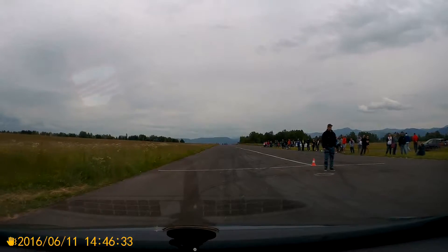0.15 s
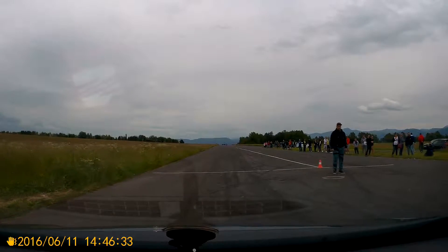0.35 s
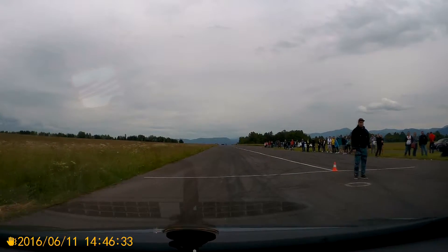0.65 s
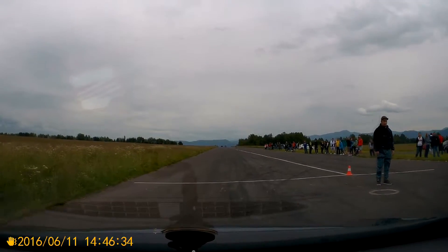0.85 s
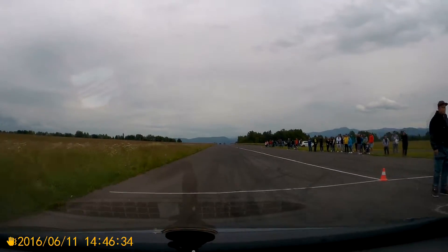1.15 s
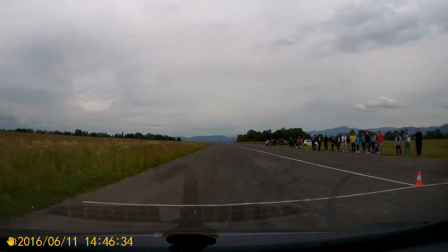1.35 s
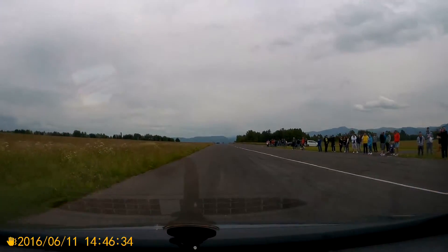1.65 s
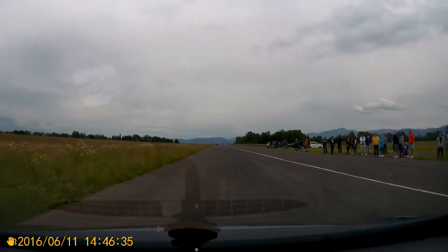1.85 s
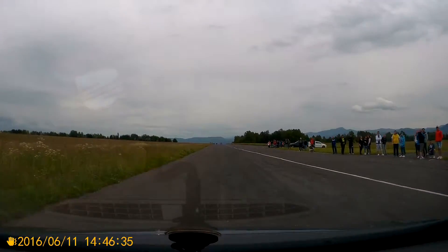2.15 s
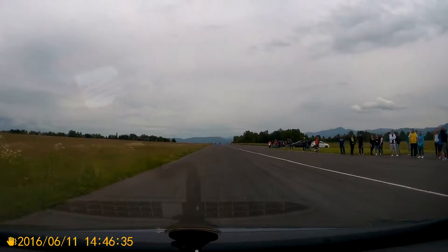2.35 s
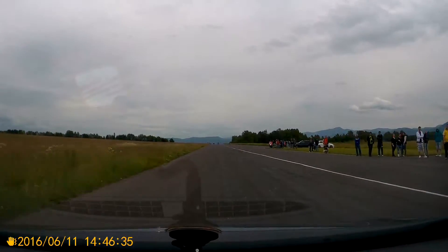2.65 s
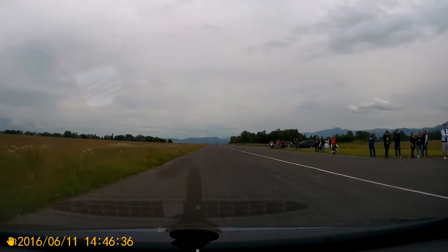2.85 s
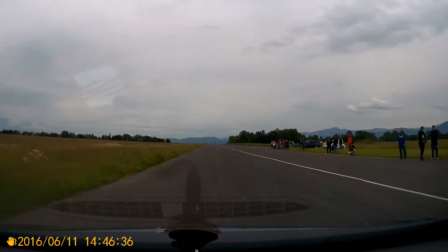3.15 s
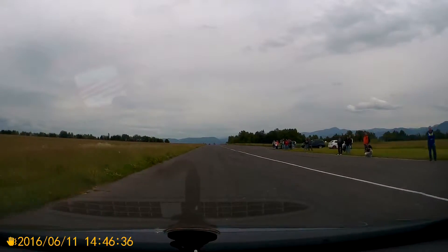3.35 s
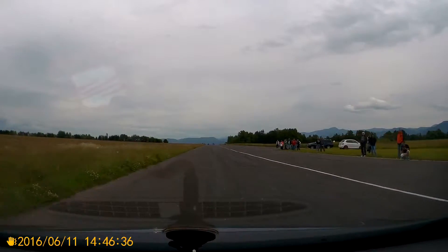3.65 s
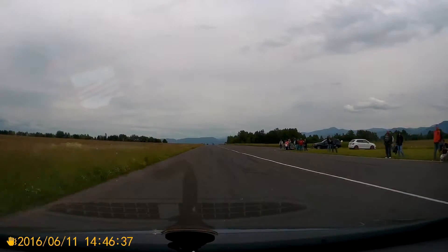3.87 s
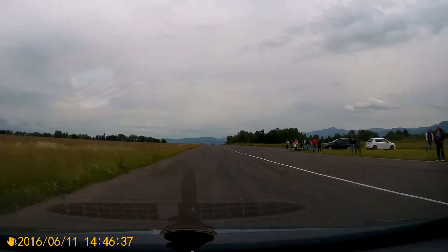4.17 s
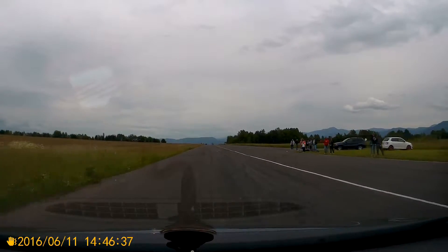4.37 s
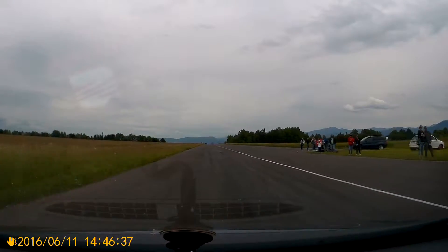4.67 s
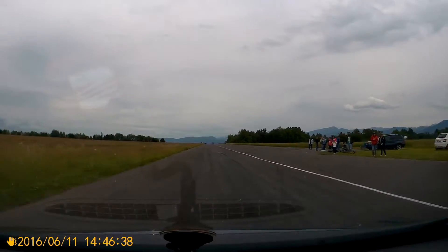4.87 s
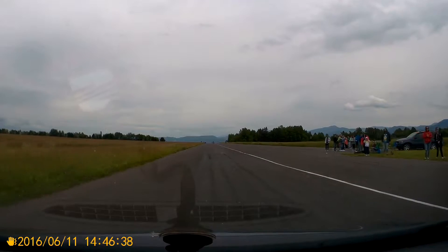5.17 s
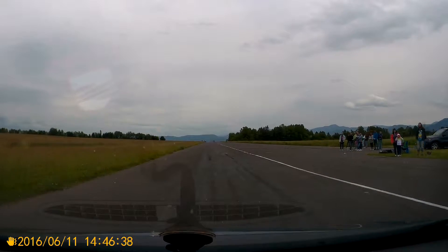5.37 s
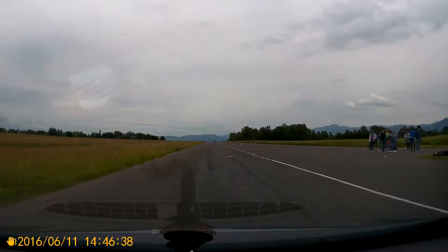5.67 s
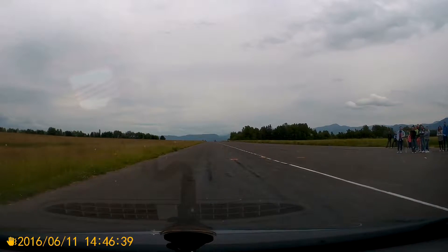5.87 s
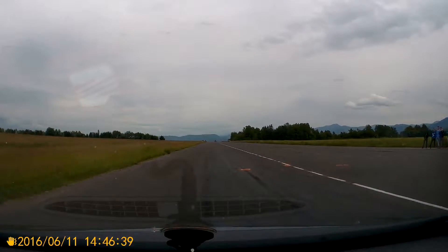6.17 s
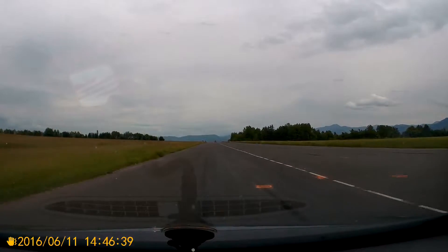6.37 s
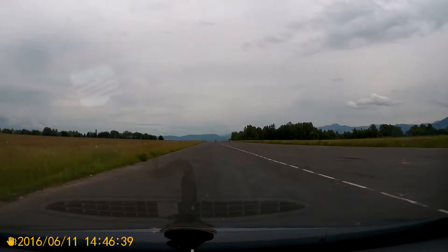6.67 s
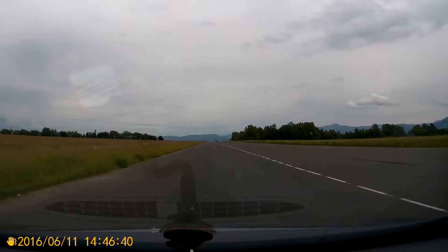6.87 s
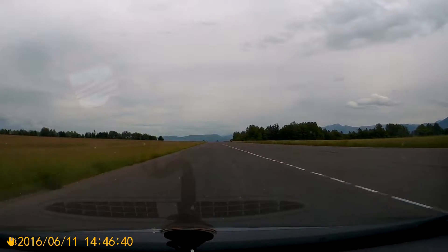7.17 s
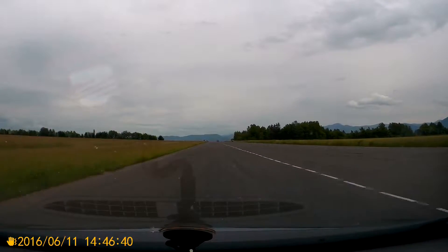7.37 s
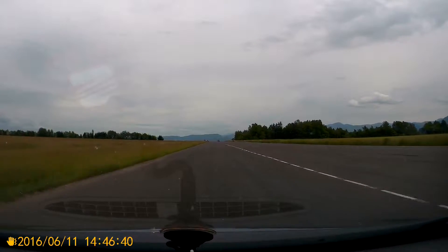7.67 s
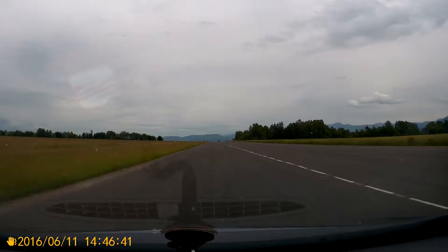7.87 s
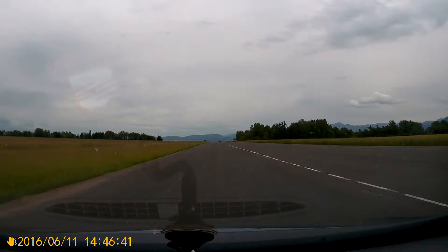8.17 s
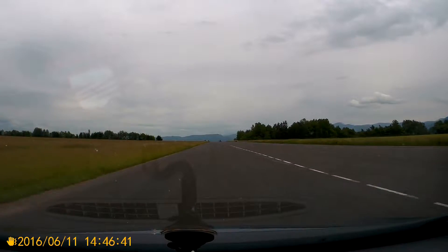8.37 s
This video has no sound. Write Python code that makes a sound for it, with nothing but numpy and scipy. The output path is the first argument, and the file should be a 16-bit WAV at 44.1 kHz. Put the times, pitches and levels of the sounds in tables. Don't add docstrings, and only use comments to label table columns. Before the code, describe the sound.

Inside a car cabin, a diesel engine revs into a violent banging launch, plastic rattling, then pulls hard through two upshifts over rumbling tyres.

```python
import sys
import numpy as np
from scipy import signal
from scipy.fft import rfft, irfft, next_fast_len
from scipy.io import wavfile
from scipy.ndimage import uniform_filter1d, map_coordinates

SR = 44100
rng = np.random.default_rng(int(sys.argv[2]) if len(sys.argv) > 2 else 0)


def inscribe(sig):
    pcm = np.round(np.clip(np.atleast_2d(sig).T, -1, 1) * 32767)
    wavfile.write(sys.argv[1], SR, pcm.astype(np.int16))


def to_linear_factor(level_db):
    exponent = np.asarray(level_db, float) / 20
    return 10 ** exponent


N = 375732

# (time [s], level [dB])
FLOOR_SHAKE = [(0, -8), (.39, -1), (.6, 16), (.7, 19), (1.15, 19.5), (1.27, 17.5), (1.4, 8), (1.58, 12.5),
               (2, 3), (2.7, -0.5), (4.3, 4), (5.52, 2.1), (5.9, 3.5), (8.52, -10)]
# (frequency [Hz], level [dB])
RUMBLE_SPECTRUM = [(12, -37.5), (25, 18.5), (45, 20), (70, 7.5), (110, 17.5), (150, 5.5), (220, -7),
                   (320, -52), (900, -120)]
# (frequency [Hz], level [dB])
HISS_SPECTRUM = [(1800, -25), (3000, -7.5), (3800, -15), (8000, -20.5), (11000, -23.5), (15700, -32)]
ROLLING_DB = -35

# (frequency [Hz], level [dB])
TICK_SPECTRUM = [(1180, -21), (2000, -0.5), (2820, -2), (3650, 5), (4560, -6.5), (5140, 1.5), (6050, -5.5),
                 (7970, -4.5), (8830, -6), (10200, -8.5), (12600, -20.5), (13800, -19), (15600, -33.5)]
# (time [s], level [dB])
CHATTER_SPELLS = [
    [(0.62, -56), (0.846, -43.5), (1.25, -49)],
    [(1.43, -45.5), (1.466, -52), (1.67, -48)],
    [(1.67, -64), (1.95, -63.5), (2.13, -64.5)],
    [(5.05, -68), (5.288, -57), (5.5, -79)],
]
# (first [s], last [s], touches [count], first level [dB], last level [dB])
ROCKING_RUNS = [(0.648, 0.6807, 5, -24, -26), (0.697, 0.72, 4, -24.5, -26.5),
                (0.742, 0.7855, 6, -21.5, -28.5), (.803, 0.8324, 4, -28, -23.5),
                (0.859, 0.894, 5, -28, -29.5), (0.905, 0.93, 5, -22.5, -29), (0.955, 1.029, 7, -31, -25),
                (1.088, 1.116, 5, -25, -28.5), (1.148, 1.18, 4, -39, -32), (1.205, 1.253, 6, -24, -33.5),
                (1.462, 1.4984, 5, -24.5, -26), (1.56, 1.592, 4, -21.5, -34.5), (1.644, 1.834, 4, -21, -30),
                (1.679, 1.9127, 5, -22.5, -27), (1.882, 2.155, 6, -29.5, -44.5), (5.123, 5.44, 7, -31, -40),
                (6.133, 6.2416, 4, -44, -42), (6.111, 6.227, 4, -57, -42), (6.767, 6.826, 4, -44, -43),
                (7.4344, 7.4984, 4, -43.5, -39.5), (7.514, 7.5438, 4, -39, -62)]
# (time [s], level [dB])
HARD_TOUCHES = [(0.569, -46), (.5909, -54.5), (0.7298, -22.5), (0.7527, -14.5), (.8434, -12), (0.9303, -16),
                (1.107, -29), (1.2685, -35), (1.3021, -33), (1.3503, -38.5), (1.38, -34), (1.393, -38.5),
                (1.449, -19), (1.4602, -26.5), (1.5319, -23.5), (1.6202, -26.5), (1.7619, -27.5),
                (1.921, -34), (1.9958, -27.5), (2.047, -30)]
# (time [s], level [dB])
LIGHT_TOUCHES = [(4.2588, -55.5), (4.6885, -52), (4.9141, -48), (5.097, -52), (5.1454, -37), (5.191, -38),
                 (5.2438, -36), (5.308, -42.5), (5.3378, -24), (5.3463, -36.5), (5.362, -33.5),
                 (5.4135, -42), (5.5428, -46.5), (5.6046, -34.5), (5.655, -42), (5.6914, -57),
                 (5.766, -39.5), (5.8674, -49), (6.4239, -47), (6.5056, -42.5), (6.5616, -36), (7.009, -48),
                 (7.07, -56), (7.577, -42.5), (7.613, -43), (7.716, -41.5), (7.919, -42), (8.023, -38),
                 (8.034, -41.5), (8.3802, -49)]
EARLY_S, UNEVEN_DB = .001, 2.2
BOUNCE_S, BOUNCE_DB = 0.0075, -10.5
GRAZE_S, GRAZE_DB = 0.0025, -15
BRIGHT, BRIGHT_PER_DB = .5, 1.86

# (time [s], peak level [dB],
# t60 [s], share in the latch [0-1])
PLASTIC_KNOCKS = [(.843, -6.5, 0.027, 0.2), (.93, -5.5, 0.027, 0.3), (1.022, -11.5, 0.021, 0.3),
                  (1.105, -26, 0.025, 0.8), (1.21, -22, .1, 0.4), (1.277, -12.5, 0.038, 0.3),
                  (1.308, -12.5, 0.038, 0), (1.455, -14, 0.07, 0.5), (1.52, -23, 0.1, 0.43),
                  (2.5, -34, 0.046, 0.94), (5.083, -29.5, 0.052, 0.7), (5.207, -21.5, 0.056, 0),
                  (5.243, -9, 0.028, 0.07), (5.447, -36, 0.02, 0.7)]
# (frequency [Hz], level [dB])
LEVER_SPECTRUM = [(290, -41.5), (500, -4.5), (923, 1), (1140, -5), (1520, -22.5), (2610, -18),
                  (3080, -34.5), (4260, -33.5), (6000, -59), (7800, -91), (13200, -120)]
# (frequency [Hz], level [dB])
LATCH_SPECTRUM = [(800, -27.5), (1330, 6), (2200, -12.5), (2600, -7), (3400, -20), (3900, -17.5),
                  (4300, -28.5), (4800, -32.5), (8000, -42)]
SPRING_S = 2.5

# (time [s], blow level [dB], shell boom level [dB], boom length [s], trim crash level [dB])
WHEEL_HOPS = [(0.641, -2, -9.5, 0.068, -23), (.725, 3.5, -2, 0.059, -14.5), (0.808, -0.5, 2, 0.055, -10.5),
              (0.896, 2, 0.5, 0.052, -12), (0.985, 1.5, 0, 0.045, -16.5), (1.073, -6.5, -5.5, 0.051, -18.5),
              (1.169, -12, -8.5, 0.014, -31.5), (1.195, -6.5, -2, 0.034, -22.5),
              (1.441, -26, -6, 0.039, -27.5), (1.508, -18, -24, 0.19, -32.5),
              (1.743, -22.5, -21, 0.16, -37), (5.339, -12.5, -18, 0.2, -49)]
# (frequency [Hz], level [dB])
CRASH_SPECTRUM = [(120, -22), (200, 1), (424, -2.5), (512, 2), (683, -5), (1130, -7.5), (1330, -18.5),
                  (1520, -13), (4000, -49.5), (5200, -65), (8800, -120)]
TAUT_HZ, SLACK_HZ = 53.45, 41.3
GRIP_S = 1.12

# (time [s], firing rate [firings per second])
FIRING_RATE = [(0, 82.8), (.13, 84.5), (.22, 100), (.42, 124), (.7, 144), (1.2, 153), (1.48, 153),
               (1.9, 77.2), (2.1, 79.6), (2.9, 101.3), (3.7, 121.9), (4.5, 138.7), (5.05, 147.9),
               (5.2, 153.5), (5.38, 154), (5.62, 99.8), (7.8, 121.8), (8.52, 128)]
# (time [s], level [dB])
ENGINE_LOAD = [(0, 6.5), (.7, 7), (1.15, -10.5), (1.4, -4), (1.55, 6), (1.72, -1.5), (2, -2.5), (2.7, -0.5),
               (4.3, 3.5), (5.1, 4), (5.3, 4), (5.52, 3.5), (5.6, -0.5), (5.9, -0.7), (8.52, 2)]
QUARTER_ORDERS_DB = [-43.5, -42, -30, -43.5, -46, -35.5, -39.5, -41, -42.5, -39.5, -37, -50, -36, -44.5,
                     -44.5, -47.5, -43, -49.5, -40.5, -59, -46.5, -45.5, -45, -50, -57.5, -43.5, -41.5]
# (frequency [Hz], level [dB])
CABIN_PATH = [(42, 2), (60, -8.5), (110, 0.5), (190, -8.5), (246, 4.5), (290, -6), (325, -1), (360, 5.5),
              (395, -2.5), (432, 7.5), (467, -7.5), (515, 1.5), (1000, -15.5)]
# (frequency [Hz], level [dB])
EXHAUST_PATH = [(80, -23.5), (92, -9.5), (103, 1), (115, 2), (124, 6.5), (138, 5), (149, 10), (165, 10),
                (184, 10), (206, 11), (230, 6), (248, 11), (278, -2.5), (305, 10)]
# (frequency [Hz], level [dB])
ROAR_SPECTRUM = [(88, -2), (150, 3), (179, -4), (220, -3.5), (278, -5.5), (431, -4.5), (562, -9),
                 (787, -14.5), (860, -13.5), (1030, -17.5), (1120, -15.5), (2070, -34.5), (5000, -64),
                 (6500, -94), (11000, -120)]
# (from [s], to [s])
CLUTCH_SPANS = [
    (0, .62),
    (1.26, 1.9),
    (5.14, 5.62),
]
# (from [s], to [s])
NEUTRAL_SPANS = [
    (1.27, 1.39),
    (5.17, 5.34),
]
# (time [s], swell [dB], half length [s])
CLUTCH_GRABS = [
    (1.26, 10, 0.17),
    (1.496, 10.5, 0.15),
    (5.264, 2.5, 0.18),
]
ROAR_DB, ROAR_DB_PER_OCTAVE, ROAR_DB_PER_S, SLIP_ROAR_DB = -32, 5.5, 0.7055, 4.5

# (from [s], to [s])
DULL_SPANS = [(.812, .83), (1.32, 1.375), (1.4, 1.43), (1.665, 1.878), (1.975, 2.012), (5.243, 5.275)]
DULL_HZ, TOP_HZ = 8800, 15700


def unit(x):
    return x / np.sqrt(np.mean(x ** 2) + 1e-20)


def along(points, hz):
    f, v = np.transpose(points)
    return np.interp(np.log(hz + 1), np.log(f + 1), v)


def curves(rows, outside=None):
    s, *cols = np.transpose(rows)
    return [np.interp(np.arange(N) / SR, s, c, outside, outside) for c in cols]


def during(spans, size):
    t = np.arange(N) / SR
    inside = sum(1. * (a < t) * (t < b) for a, b in spans)
    return uniform_filter1d(inside, size)


def wobble(rate):
    coarse = np.arange(0, N + 32, 32)
    knots = rng.standard_normal(int(N * rate / SR) + 5)
    return np.interp(np.arange(N), coarse, map_coordinates(knots, [coarse * rate / SR]))


def coloured(x, spectrum):
    m = 4096
    gain = to_linear_factor(along(spectrum, np.fft.rfftfreq(m, 1 / SR)))
    cepstrum = irfft(np.log(gain + 1e-6), m)
    cepstrum[1:m // 2] *= 2
    cepstrum[m // 2 + 1:] = 0
    ring = irfft(np.exp(rfft(cepstrum)), m)
    return signal.fftconvolve(x, ring / np.linalg.norm(ring))[:len(x)]


def noise(spectrum):
    m = next_fast_len(N)
    gain = to_linear_factor(along(spectrum, np.fft.rfftfreq(m, 1 / SR)))
    return unit(irfft(rfft(rng.standard_normal(m)) * gain, m)[:N])


def add(track, s, sound):
    part = track[round(s * SR):][:len(sound)]
    part += sound[:len(part)]


def road():
    shake_db, = curves(FLOOR_SHAKE)
    rumble = unit(to_linear_factor(3.3 * wobble(4.8)) * noise(RUMBLE_SPECTRUM))
    return to_linear_factor(ROLLING_DB + shake_db) * rumble + to_linear_factor(-70.5) * noise(HISS_SPECTRUM)


def touches():
    first, last, count, first_db, last_db = np.transpose(ROCKING_RUNS)[:, :, None]
    chance = rng.standard_normal((len(ROCKING_RUNS), 8, 2))
    done = np.arange(8) / (np.round(count) - 1)
    s = first + (last - first) * done + EARLY_S * chance[..., 1]
    db = first_db + (last_db - first_db) * done + UNEVEN_DB * chance[..., 0]
    rocking = np.transpose([s[done <= 1], db[done <= 1]])
    rows = np.vstack([rocking, HARD_TOUCHES, LIGHT_TOUCHES])
    spread = rng.standard_normal((2, 2, len(rows))) * [[.3], [5]]
    rebound = np.transpose([BOUNCE_S * np.exp(spread[0, 0]), BOUNCE_DB + spread[0, 1]])
    graze = np.transpose([-GRAZE_S * np.exp(spread[1, 0]), GRAZE_DB + spread[1, 1]])
    return np.vstack([rows, rows + rebound, rows + graze])


def mount():
    ticks, t = np.zeros(N), np.arange(SR // 40) / SR
    buzz_fade = to_linear_factor(-15 - 60 * t / 0.027) + to_linear_factor(-15 - 60 * t / 0.076)
    rows = touches()
    grains = rng.standard_normal((len(rows), len(t)))
    for (s, db), grain in zip(rows, grains):
        bright = np.clip(BRIGHT + BRIGHT_PER_DB * (db + 30.5), 0, 1)
        contact = np.array([1, -bright + 0.11 * grain[0], 0.44 * grain[1]])
        add(ticks, s, to_linear_factor(db + 12.5) * contact)
        add(ticks, s, to_linear_factor(db - 9.5) * grain * buzz_fade)
    level = sum(to_linear_factor(curves(rows, outside=-120)[0]) for rows in CHATTER_SPELLS)
    crowd = unit(rng.standard_normal(N) * to_linear_factor(1.3 * wobble(580)))
    return coloured(ticks + to_linear_factor(-3) * level * crowd, TICK_SPECTRUM)


def knocks():
    lever, latch, spring = np.zeros(N), np.zeros(N), np.zeros(N)
    t = np.arange(SR // 5) / SR
    for s, db, t60, thin in PLASTIC_KNOCKS:
        fade = to_linear_factor(-60 * (t / np.clip(t60, .01, .2)) ** 1.65) * (1 - np.exp(-t / 0.00016))
        hit = to_linear_factor(db - 1.0) * fade * rng.standard_normal(len(t))
        share = np.clip(thin, 0, 1)
        add(lever, s, (1 - share) * hit)
        add(latch, s, share * hit)
        add(spring, s, (abs(s - SPRING_S) < .01) * hit)
    ring = to_linear_factor(-60 * t / .09) * (np.sin(2 * np.pi * 3500 * t) + np.sin(2 * np.pi * 4300 * t))
    ringing = to_linear_factor(-42) * signal.fftconvolve(spring, ring)[:N]
    return coloured(lever, LEVER_SPECTRUM) + coloured(latch, LATCH_SPECTRUM) + ringing


def hops():
    body, shake = np.zeros(N), np.zeros(N)
    t = np.arange(SR // 3) / SR
    lead = .012
    u = t - lead
    for s, blow_db, boom_db, length, crash_db in WHEEL_HOPS:
        boom_hz = TAUT_HZ if s < GRIP_S else SLACK_HZ
        done = np.clip(t / (length + lead), 0, 1)
        swell = np.abs(np.sin(np.pi * done ** 1.09)) ** 0.52
        boom = swell * np.cos(2 * np.pi * boom_hz * u)
        blow = np.exp(-np.where(u < 0, (u / 0.0048) ** 2, u / 0.015)) * np.cos(2 * np.pi * 140 * u)
        panel = to_linear_factor(crash_db + 4.5 - 60 * t / 0.11) * np.sin(2 * np.pi * 512 * t)
        add(body, s - lead, to_linear_factor(blow_db) * blow + to_linear_factor(boom_db) * boom)
        add(body, s - .004, panel)
        add(shake, s - .007, to_linear_factor(crash_db) * np.clip(t / 0.0026, 0, 1) * (1 - done ** 3))
    jolts = to_linear_factor(3.2 * wobble(120))
    return body + shake * unit(jolts * noise(CRASH_SPECTRUM))


def engine():
    rate, = curves(FIRING_RATE)
    load_db, = curves(ENGINE_LOAD)
    t = np.arange(N) / SR
    free = during(CLUTCH_SPANS, size=3000)
    turn = 2 * np.pi * np.cumsum(rate) / SR

    howl_db = 23 * during(NEUTRAL_SPANS, size=2500) - 8
    unloaded_db = {.5: 5, 1: -2, 2: -4, 3: howl_db}
    tones = np.zeros(N)
    for quarters, db in enumerate(QUARTER_ORDERS_DB, start=2):
        k = quarters / 4
        path = EXHAUST_PATH if k in (1, 2) else CABIN_PATH
        free_db = unloaded_db.get(k, -8) * free
        unsteady_db = (1.5 + 1.2 * free) * wobble(11)
        unsteady_db += 1.8 * (k > 2) * (1 - free) * wobble(2.5)
        drift = .22 * wobble(7) + rng.uniform(0, 2 * np.pi)
        level = to_linear_factor(1 + db + along(path, k * rate) + free_db + unsteady_db)
        tones += level * np.sin(k * turn + drift)

    roar_db = ROAR_DB + ROAR_DB_PER_OCTAVE * np.log2(rate / 100)
    roar_db += ROAR_DB_PER_S * t + SLIP_ROAR_DB * (t < GRIP_S)
    for s, swell_db, half in CLUTCH_GRABS:
        roar_db += swell_db * np.clip(1 - np.abs(t - s) / half, 0, 1)
    puff = 1 + 0.12 * np.cos(turn) + 0.058 * np.cos(turn / 2 + 1)
    roar = unit(puff * to_linear_factor(0.29 * wobble(12)) * noise(ROAR_SPECTRUM))
    return to_linear_factor(load_db) * tones + to_linear_factor(roar_db) * roar


def scene():
    return (road() + mount() + knocks() + hops() + engine())[None]


def top_cut(x):
    return signal.sosfilt(signal.butter(12, 15710, fs=SR, output="sos"), x)


def record(dry):
    clipped = dry / (1 + np.abs(dry / .995) ** 30) ** (1 / 30)
    m = next_fast_len(N)
    hz = np.fft.rfftfreq(m, 1 / SR)
    spectrum = rfft(clipped, m)
    full = irfft(spectrum * (hz < TOP_HZ), m)[:, :N]
    muffled = irfft(spectrum * (hz < DULL_HZ), m)[:, :N]
    dull = .94 * during(DULL_SPANS, size=200)
    mix = np.clip((1 - dull) * full + dull * muffled, -1, 1)
    return top_cut(mix)


dry = scene()
out = record(dry)
inscribe(out)
```